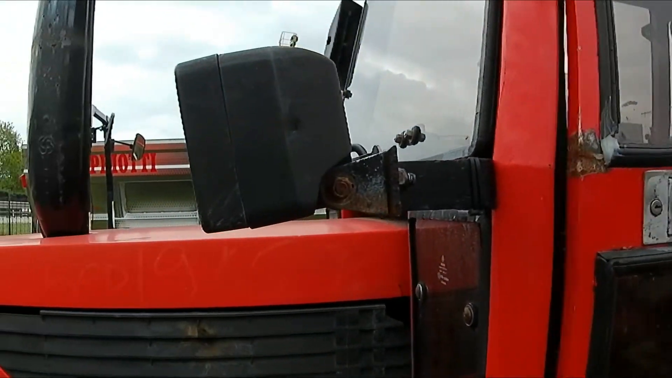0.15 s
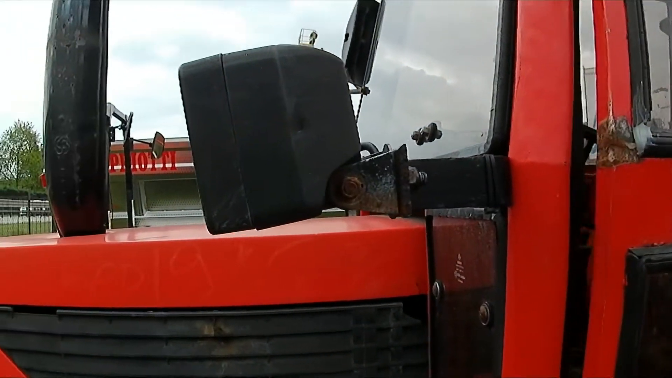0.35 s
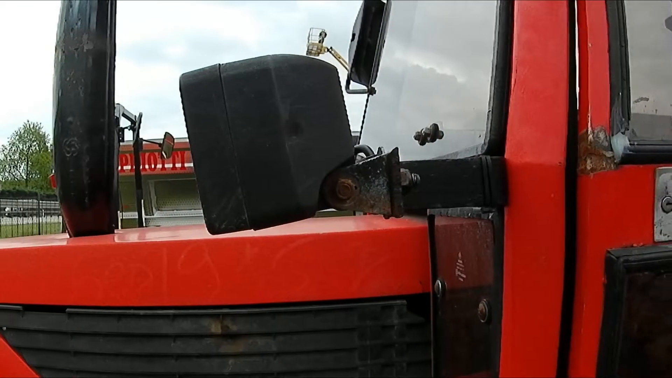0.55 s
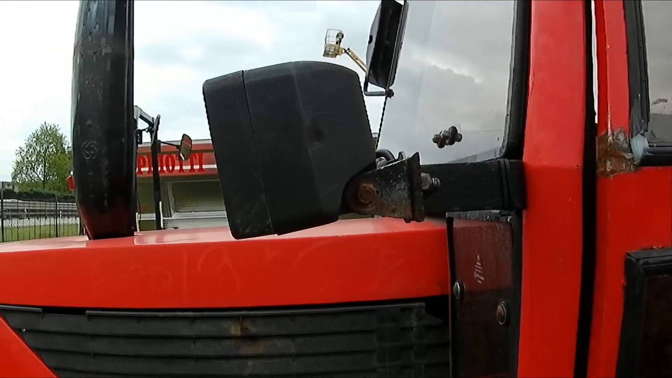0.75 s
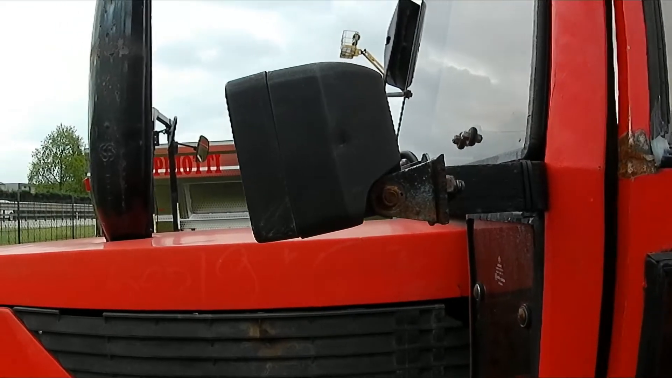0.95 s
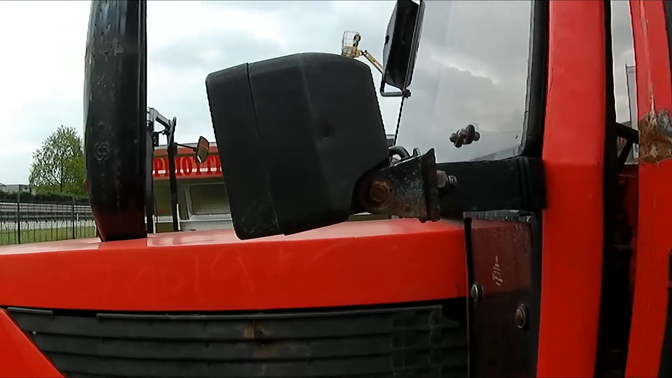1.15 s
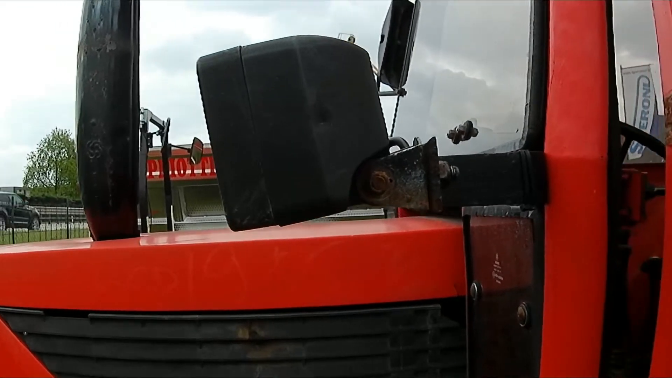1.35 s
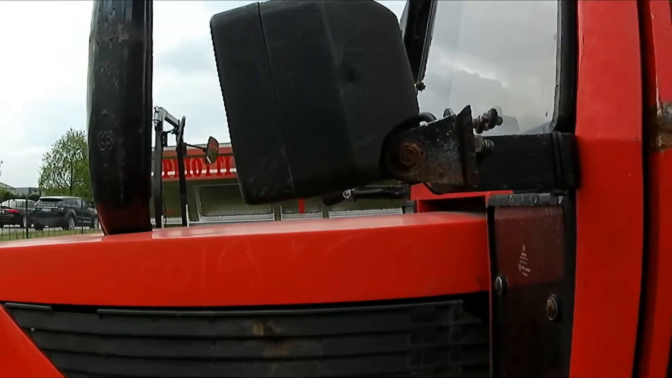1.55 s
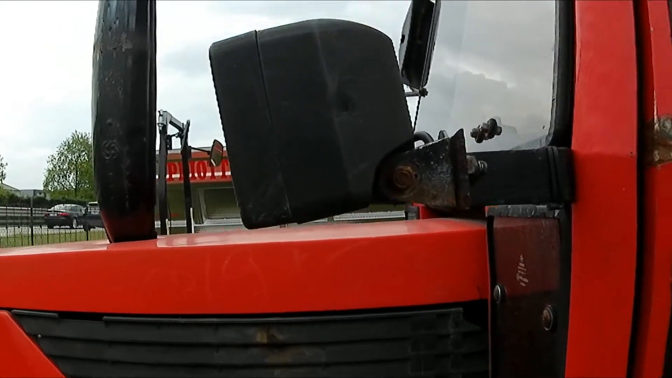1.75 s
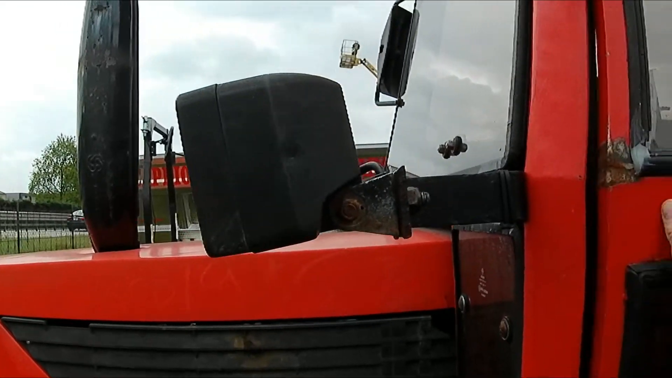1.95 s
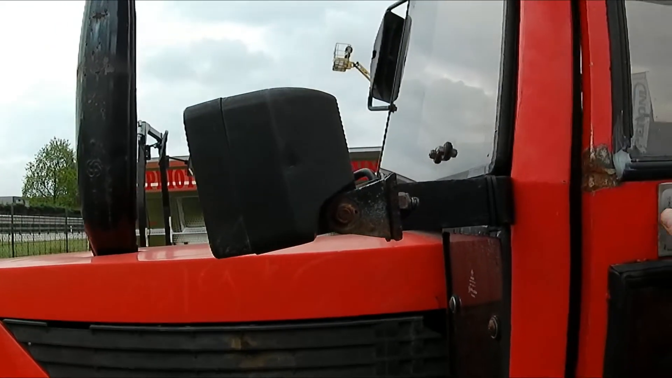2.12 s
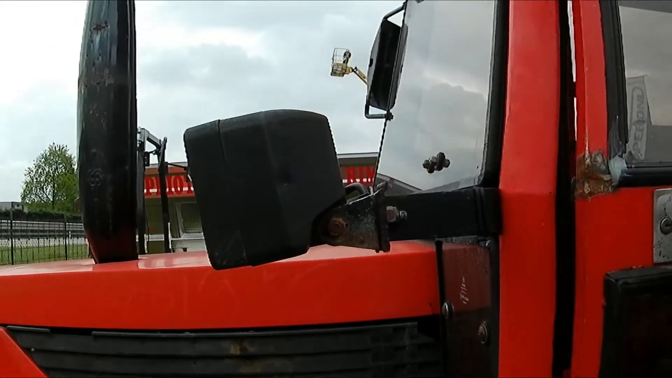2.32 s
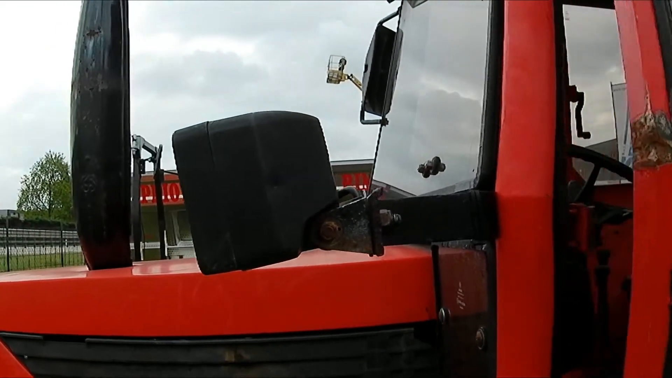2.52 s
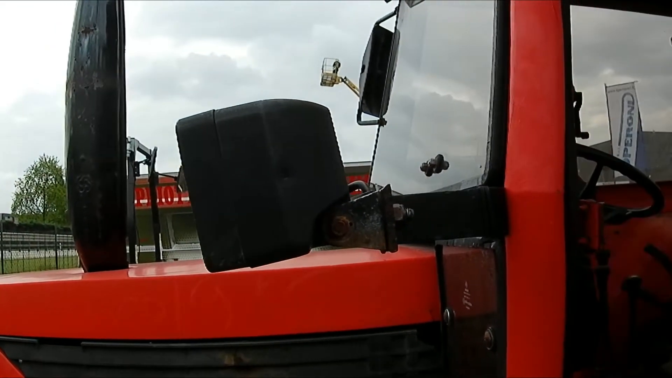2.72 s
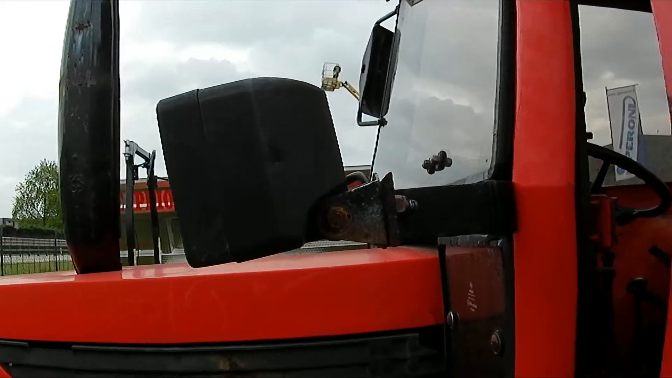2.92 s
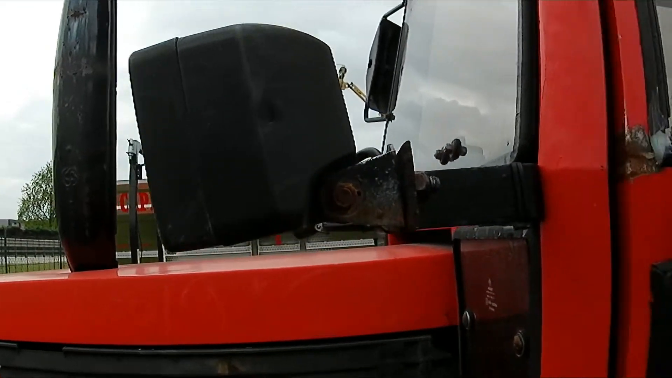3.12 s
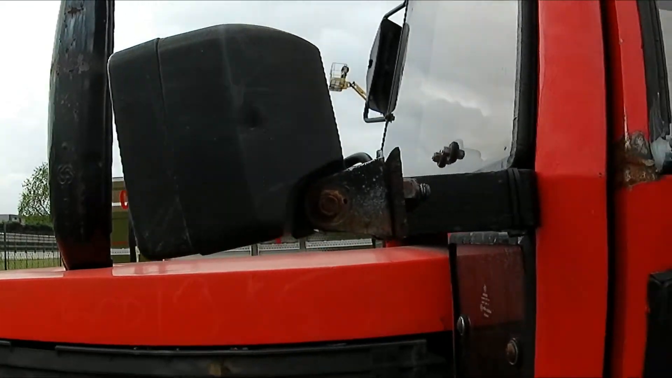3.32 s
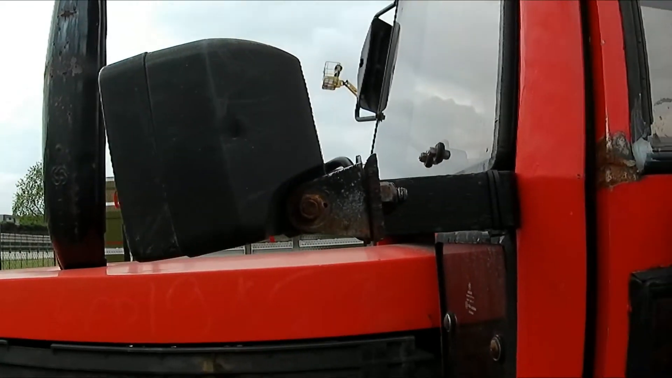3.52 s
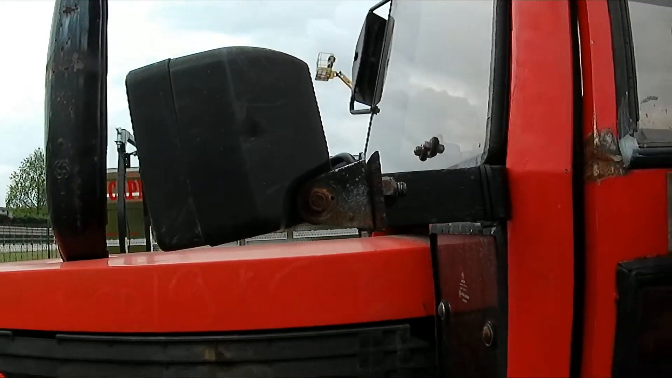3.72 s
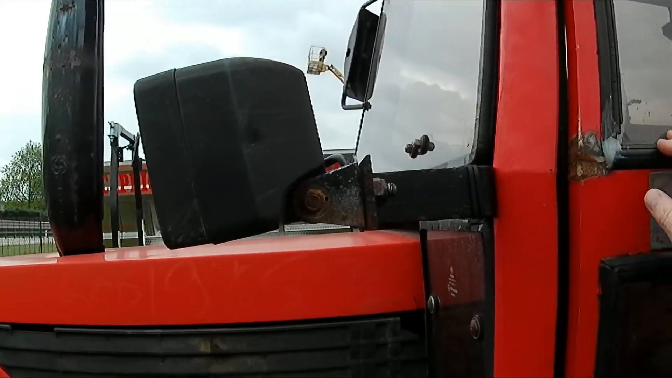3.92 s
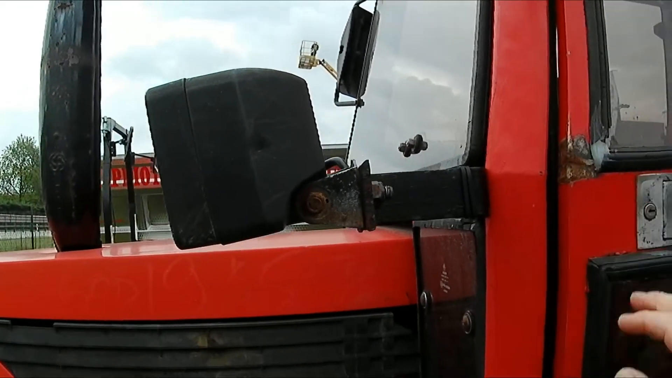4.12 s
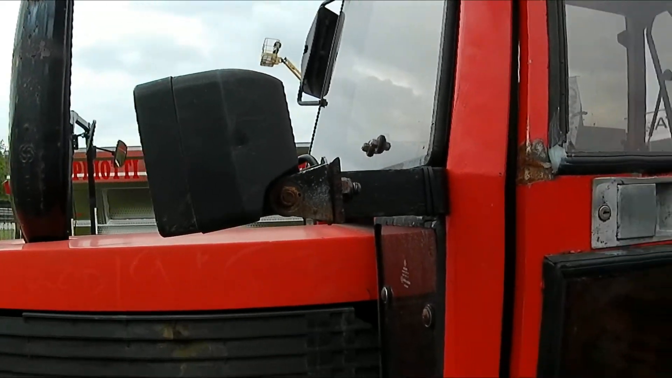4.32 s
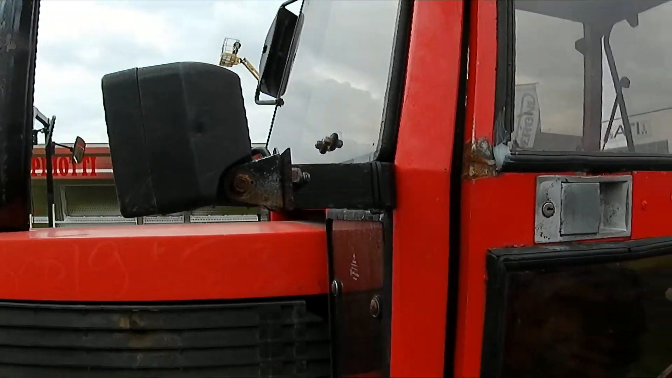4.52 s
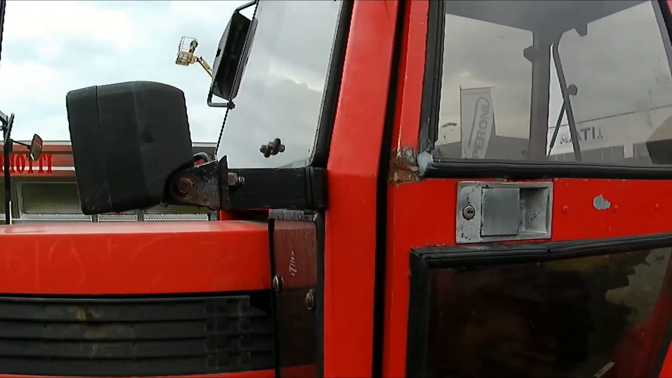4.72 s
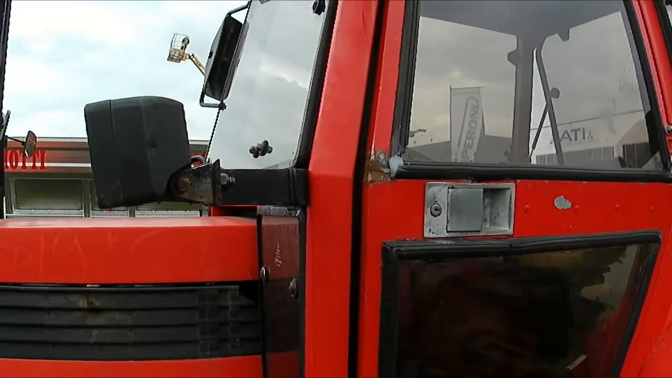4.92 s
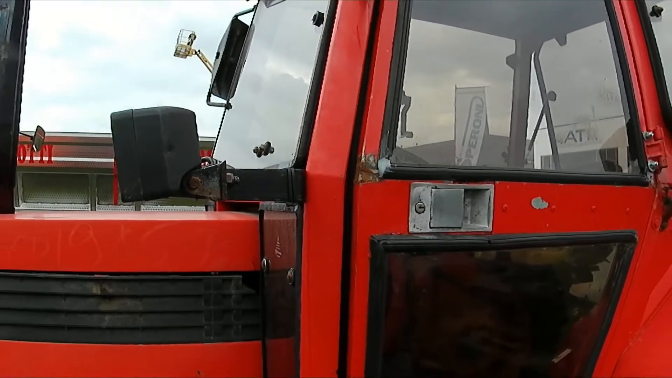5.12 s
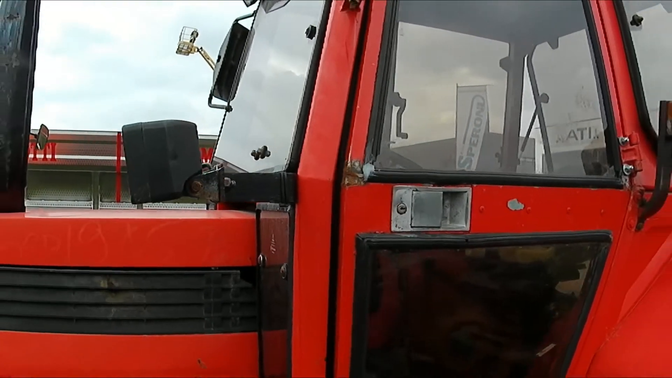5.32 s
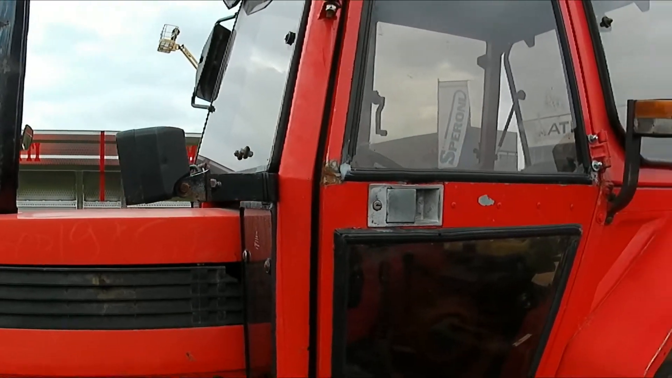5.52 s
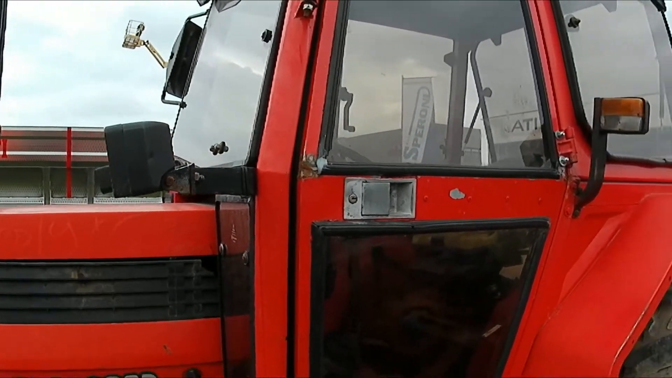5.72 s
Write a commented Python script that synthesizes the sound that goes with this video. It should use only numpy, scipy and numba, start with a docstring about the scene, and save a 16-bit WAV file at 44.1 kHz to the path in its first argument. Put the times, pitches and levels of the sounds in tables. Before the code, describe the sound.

Three loud, boomy metal door slams with clacking latch and brief rattle, over steady traffic wash that swells as one car passes close.

```python
"""The steel door of a tractor cab, slammed by hand three times in an open yard beside a road: pushes excite
its decaying modes, latch contacts add damped knocks, and the panes, panels and yard add shaped noise.
Cars pass, one close, as sliding bands of tyre noise over rumble, drone and hiss; a slow vehicle adds a
harmonic engine tone, and a soft thump is heard near the end. An overloading microphone feeds two paths,
one under gain control, the other late and thin in the bass; their sum combs every sound."""
import sys
import numpy as np
from scipy import signal
from scipy.fft import rfft, irfft, next_fast_len
from scipy.io import wavfile
from scipy.ndimage import uniform_filter1d
from numba import njit

SR = 44100
rng = np.random.default_rng(int(sys.argv[2]) if len(sys.argv) > 2 else 0)


def amplitude_ratio(level_db):
    """Convert a level in decibels to the matching linear amplitude (field) ratio."""
    exponent = np.asarray(level_db, float) / 20
    return 10 ** exponent


def inscribe(sig):
    """Save sig as 16-bit PCM at rate SR to the path in sys.argv[1].

    A 1-D sig is mono; a 2-D sig holds one channel per row.
    Samples are clipped to [-1, 1] before scaling.
    """
    pcm = np.round(np.clip(np.atleast_2d(sig).T, -1, 1) * 32767)
    wavfile.write(sys.argv[1], SR, pcm.astype(np.int16))


N = 253829
T = np.arange(N) / SR


def colour(x, points):
    """Spectral shaping: filter x by (frequency_hz, density_db) points, then scale it to rms 1."""
    hz, db = np.transpose(points)
    size = next_fast_len(len(x))
    f = np.maximum(np.arange(size // 2 + 1) * SR / size, 1)
    gain = amplitude_ratio(np.interp(np.log(f), np.log(hz), db))
    y = irfft(rfft(x, size) * gain, size)[:len(x)]
    return y / np.std(y)


def noise(points):
    """Stationary random sound: white noise of a given spectral shape, rms 1."""
    return colour(rng.standard_normal(N), points)


def fade(start_s, t60_s, rise_s):
    """Reverberant envelope: silence, an exponential rise (time constant rise_s), an exponential decay."""
    age = np.maximum(T - start_s, 0)
    return (1 - np.exp(-age / rise_s)) * np.exp(-np.log(1000) * age / t60_s)


def half_sine(start_s, length_ms):
    """Contact pulse: one half cycle of a sine, peak 1."""
    part = np.clip((T - start_s) / (length_ms / 1000), 0, 1)
    return np.sin(np.pi * part)


def walk(rate_hz):
    """Slow fluctuation: held random steps smoothed twice, spread near 1."""
    hold = int(SR / rate_hz)
    steps = np.repeat(rng.standard_normal(N // hold + 1), hold)
    smooth = uniform_filter1d(uniform_filter1d(steps, hold), hold)
    return 1.44 * smooth[:N]


def curve(table, at=T):
    """Linear interpolation of a two-column table over time."""
    return np.interp(at, *np.transpose(table))


def wavering_noise(points, level_db, waver_db):
    """Amplitude modulation: shaped noise at a moving level with a slow random waver."""
    return noise(points) * amplitude_ratio(level_db + waver_db * walk(5.33))


# Passing cars: start_s, roar_db, roar centre_hz, tread wash_db
ROAD = [(0.03, -36, 940, -50), (0.45, -41, 755, -55), (0.65, -44, 886, -59.5), (1.0, -40, 740, -56.5),
        (1.3, -41, 770, -70.5), (1.55, -43.5, 970, -54), (1.95, -45.5, 930, -55.5), (2.3, -46, 960, -59),
        (2.75, -47, 1025, -62.5), (3.4, -46, 815, -60.5), (3.76, -36.5, 825, -59.5),
        (4.07, -29.5, 784, -50.5), (4.3, -32.5, 810, -47), (4.58, -31.5, 735, -47.5), (4.78, -34, 945, -53),
        (5.05, -34, 1040, -55), (5.3, -40.5, 900, -56), (5.5, -44.5, 880, -60.5), (5.76, -44.5, 1000, -64)]
# Tyre roar spectrum: share of the centre frequency (ratio), density_db (relative, per Hz)
TYRES = [(.2, -16.5), (.45, -4), (.7, -3.5), (1.01, -0.5), (1.4, -4.5), (2.1, -13.5), (3, -30), (5, -44.5)]
# Change on the roar's upper flank: start_s, level_db
FLANK = [(0, -3), (.7, 3.5), (1.4, 6.5), (2.5, 1), (3.5, 1), (4.0, -9.5), (4.5, 4), (5.0, 1), (5.76, -.3)]
# Change at the top of the roar's hump: start_s, level_db
CREST = [(0, -0.5), (.8, -1.5), (1.3, 1), (2.5, -0.5), (3.5, -0.5), (4.1, 6.5), (4.6, 0.5), (5.1, 2.5),
         (5.76, -4)]


def tyre_roar():
    """Filter-bank synthesis: wavering third-octave noise bands follow a spectral hump that slides in pitch."""
    flank_share, flank_octaves, crest_octaves = 2.97, 0.2, 0.52  # place over the centre, half widths
    coarse = np.arange(0, N + 256, 256) / SR  # band levels are worked out every 256 samples
    start_s, road_roar_db, road_centre_hz, _ = np.transpose(ROAD)
    roar_db = np.interp(coarse, start_s, road_roar_db)
    centre_hz = np.interp(coarse, start_s, road_centre_hz)
    share, density_db = np.transpose(TYRES)
    bands_hz = 100 * 2 ** np.arange(0, 5.7, 1 / 3)
    rel = bands_hz[:, None] / centre_hz
    # the second term turns level per Hz into level per band
    db = np.interp(np.log(rel), np.log(share), density_db) + 10 * np.log10(rel)
    db += curve(FLANK, coarse) * np.exp(-(np.log2(rel / flank_share) / flank_octaves) ** 2)
    db += curve(CREST, coarse) * np.exp(-(np.log2(rel) / crest_octaves) ** 2)
    db += roar_db - 10 * np.log10(np.sum(amplitude_ratio(2 * db), axis=0))  # the bands' powers add up to roar_db
    size = next_fast_len(N)
    octaves = np.log2(np.maximum(np.arange(size // 2 + 1) * SR / size, 1))
    white = rfft(rng.standard_normal(size))
    roar = np.zeros(N)
    for hz, band_db in zip(bands_hz, db):
        triangle = np.clip(1 - 3 * abs(octaves - np.log2(hz)), 0, 1)
        band = irfft(white * triangle, size)[:N]
        roar += band / np.std(band) * amplitude_ratio(np.interp(T, coarse, band_db) + 1.76 * walk(5.715))
    return roar


# Tread noise spectrum: frequency_hz, density_db (relative, per Hz)
WASH = [(900, -25), (1600, 0.5), (2500, -2), (4000, -14.5), (6000, -29), (9000, -35)]


def tread_wash():
    """Broadband source: tread noise whose level moves with the passing cars."""
    start_s, _, _, wash_db = np.transpose(ROAD)
    return wavering_noise(WASH, np.interp(T, start_s, wash_db), 2.3)


# Bounce of tyre sound off the ground: start_s, notch_hz, bounce (gain, 0 to 1)
GROUND = [(0, 3330, 0.13), (1.4, 2700, 0), (1.9, 2700, 0.24), (3.6, 2920, 0.01), (4.6, 3350, 0.11),
          (5.0, 2500, 0.32), (5.5, 1870, 0.22)]


def ground(x):
    """Two-path interference: a duller bounced copy, half a notch period late, cancels a sliding band."""
    start_s, notch_hz, bounce = np.transpose(GROUND)
    share = np.clip(np.interp(T, start_s, bounce), 0, 0.9)
    # rough ground returns little above 3500 Hz
    dull = signal.filtfilt(*signal.butter(1, 3500, fs=SR), x)
    delay_s = 0.5 / np.interp(T, start_s, notch_hz)
    late = np.interp(T - delay_s, T, dull)
    return (x + share * late) / (1 + share)


# Rumble spectrum: frequency_hz, density_db (relative, per Hz)
RUMBLE = [(15, -27), (30, -4), (55, 4), (75, -2), (120, -4), (170, -11), (300, -70)]
# Rumble level: start_s, level_db
RUMBLE_LEVEL = [(0, -28), (.5, -36), (1.2, -32.5), (1.9, -36.5), (2.85, -40.5), (3.7, -40.5), (4.2, -34),
                (4.9, -35.5), (5.4, -40), (5.76, -30)]


def rumble():
    """Low-frequency random sound: road rumble at a moving level."""
    return wavering_noise(RUMBLE, curve(RUMBLE_LEVEL), 2)


# Exhaust drone spectrum: frequency_hz, density_db (relative, per Hz)
DRONE = [(90, -25), (150, 10.5), (250, 11.5), (380, 3), (600, -42.5)]


def drone():
    """Level covariation: exhaust noise rises with the tyre roar, a little less; a slow vehicle adds more."""
    start_s, road_roar_db, _, _ = np.transpose(ROAD)
    roar_mid_db, under_roar_db, follows = -40.5, -7, 0.66
    extra_start_s, extra_db, extra_rise_s = 5.13, 4.8, 0.33
    roar_db = np.interp(T, start_s, road_roar_db)
    level_db = roar_mid_db + under_roar_db + follows * (roar_db - roar_mid_db)
    level_db += extra_db * np.clip((T - extra_start_s) / extra_rise_s, 0, 1)
    return wavering_noise(DRONE, level_db, 1)


# Hiss spectrum: frequency_hz, density_db (relative, per Hz)
HISS = [(1500, -20), (4000, 0), (8000, -5), (12000, -7), (16000, -9)]
# Hiss level: start_s, level_db
HISS_LEVEL = [(0, -67.5), (.8, -76.5), (1.3, -80), (2.2, -84), (3.0, -73.5), (3.45, -75), (3.9, -69),
              (4.2, -66), (4.4, -73), (4.68, -86), (5.2, -70), (5.76, -76)]


def hiss():
    """High-frequency random sound: top hiss at a moving level."""
    return wavering_noise(HISS, curve(HISS_LEVEL), 2.3)


def road():
    """Superposition: tyre sounds interfere with their ground bounce; rumble, drone and hiss add directly."""
    return rumble() + drone() + ground(tyre_roar() + tread_wash()) + hiss()


# Door meets its seal, then rebounds on the latch: start_s, blow level_db, push_ms, edge_db (over the blow)
SLAMS = [(0.1063, -3.5, 5.8, -5), (0.142, -18.5, 13, -12), (1.5456, -1, 4.16, -6), (1.581, -23, 15, 2),
         (3.0845, -3, 7.7, -12), (3.12, -14.5, 14, 1.5)]
# Modes of door skin and cab air: pitch_hz, level_db, t60_s, first swing (-1 in, 1 out)
DOOR = [(45.35, 2.5, 0.34, -1), (60.5, -8, 0.3, 1), (83.15, -3, 0.6, -1), (105.06, -6.5, 0.46, 1),
        (122, -11, 0.38, -1), (186.2, 1, 0.3, -1), (257, -23, 0.052, 1), (299, -3.5, 0.19, -1),
        (410.3, -34, 0.99, 1), (499.6, 0.5, 0.094, -1), (636, -28, 0.8, 1), (663, -7, 0.34, -1)]


def push(start_s, level_db, length_ms):
    """Impulse of a force: a half sine whose area, whatever its length, is set by the level."""
    unit_area = np.pi / (2 * length_ms / 1000 * SR)
    return amplitude_ratio(level_db) * half_sine(start_s, length_ms) * unit_area


def ring(force, pitch_hz, t60_s):
    """Modal resonance: one exponentially decaying mode driven by a force."""
    pole = np.exp(2j * np.pi * pitch_hz / SR - np.log(1000) / (t60_s * SR))
    return signal.lfilter([1], [1, -pole], force).imag


def door():
    """Modal excitation: a push sets off the low modes; its short hard edge reaches the higher ones."""
    force = np.zeros(N)
    for start_s, level_db, push_ms, edge_db in SLAMS:
        force += push(start_s, level_db, push_ms)
        force += push(start_s + 0.00369, level_db + edge_db, 1.35)
    return sum(np.sign(way) * amplitude_ratio(level_db) * ring(force, pitch_hz, t60_s)
               for pitch_hz, level_db, t60_s, way in DOOR)


# Crowded upper panel modes: frequency_hz, density_db (relative, per Hz)
CLANK = [(150, -39), (300, 9), (600, -2), (1000, -8.5), (2000, -22), (5000, -61)]
# Dense ringing of cab panels and yard: frequency_hz, density_db (relative, per Hz)
YARD = [(30, -16), (55, 4), (110, 12.5), (250, 5), (600, -16.5), (1500, -22), (4000, -41.5), (15000, -66)]


def clank_and_yard():
    """Diffuse-field decay: every blow swells and dies as noise, a short clank and a longer tail."""
    out = np.zeros(N)
    for shape, tail_db, t60_s in ((CLANK, -9, 0.24), (YARD, -9, 0.52)):
        swell = sum(amplitude_ratio(level_db + tail_db) * fade(start_s, t60_s, 0.022) for start_s, level_db, *_ in SLAMS)
        out += swell * noise(shape)
    return out


# Latch and striker contacts, the same run at every slam: delay_ms after the first contact (before pace),
# level_db (relative to the run), knock pitch_hz (before pitch share), crack_db (relative to the knock)
LATCH = [(0, 6, 2500, -13.5), (3.48, 11, 893, -15), (4.523, 2.5, 1080, -14.5), (5.85, 0, 830, -3),
         (8.11, -0.5, 1440, -25), (11.14, -3, 780, -13), (20.86, -9, 580, -23)]
# Each run of the latch: start_s, level_db, pitch share (ratio), pace share (ratio), first tick_db (added)
CATCHES = [(.1098, -7, 0.838, 1.05, 1.5), (1.55, 1, 1.005, 1.05, 0), (3.0893, -.5, 0.902, .99, -1.5)]
# Spectrum of latch cracks and of rattle ticks: frequency_hz, density_db (relative, per Hz)
TICK_COLOUR = [(200, 7), (600, 10), (1500, 5), (3000, -0.5), (6000, -17.5), (15000, -24.5)]


def latch():
    """Damped impact: each contact is a heavily damped knock, shorter when higher, with a crack of noise."""
    decay_cycles, rise_cycles = 6.8, 0.41  # periods to fall 60 dB, and rise time constant in periods
    crack_t60_s, crack_rise_s = 0.004, 0.0002
    crack = noise(TICK_COLOUR)
    out = np.zeros(N)
    for run_s, run_db, pitch, pace, tick_db in CATCHES:
        for k, (delay_ms, contact_db, contact_hz, crack_db) in enumerate(LATCH):
            start_s = run_s + pace * delay_ms / 1000
            level_db = run_db + contact_db + (tick_db if k == 0 else 0)
            hz = pitch * contact_hz
            knock = fade(start_s, decay_cycles / hz, rise_cycles / hz) * np.sin(2 * np.pi * hz * (T - start_s))
            snap = amplitude_ratio(crack_db) * fade(start_s, crack_t60_s, crack_rise_s) * crack
            out += amplitude_ratio(level_db) * (knock + snap)
    return out


# Loose panes and linkage buzz: start_s, level_db, t60_s
RATTLES = [(0.1105, -15, 0.059), (0.128, -33, 0.075), (0.137, -29, 0.07), (1.546, -25, 0.13),
           (1.564, -45, 0.053), (1.582, -24.5, 0.035), (2.285, -48, .01), (3.086, -26, 0.053),
           (3.101, -26.5, 0.079), (3.12, -21.5, 0.021)]


def rattle():
    """Random repeated impacts: dense noise of uneven strength swells and dies away as loose panes do."""
    uneven = rng.standard_normal(N) * amplitude_ratio(1.9 * walk(900))
    swells = sum(amplitude_ratio(level_db) * fade(start_s, t60_s, 0.00043) for start_s, level_db, t60_s in RATTLES)
    return colour(uneven, TICK_COLOUR) * swells


# Engine of a slow vehicle: start_s, level_db
ENGINE = [(3.9, -56), (4.35, -54), (4.47, -42.5), (5.48, -39), (5.686, -31), (5.756, -43)]
# Harmonics of the firing rate, from the first up: level_db (relative)
ENGINE_ORDERS_DB = [5, -2, -13]


def engine():
    """Harmonic series: firing tone and its first orders, wavering in pitch and level."""
    firing_hz = 55.7 * (1 + 0.0061 * walk(4))
    phase = 2 * np.pi * np.cumsum(firing_hz) / SR
    fade_in = np.clip((T - ENGINE[0][0]) / 0.47, 0, 1)
    gain = amplitude_ratio(curve(ENGINE) + 1.9 * walk(17)) * fade_in
    orders = sum(amplitude_ratio(db) * np.sin(k * phase) for k, db in enumerate(ENGINE_ORDERS_DB, 1))
    return np.sqrt(2) * gain * orders


# Soft thump spectrum: frequency_hz, density_db (relative, per Hz)
THUMP_COLOUR = [(40, -1), (110, 11), (250, 0), (450, -2), (900, -62)]
# Soft thump: start_s, level_db, length_ms
THUMP = (5.63, -30, 53)


def thump():
    """Soft impact: a half-sine burst of low noise, a dull bump like a footfall."""
    start_s, level_db, length_ms = THUMP
    return amplitude_ratio(level_db) * half_sine(start_s, length_ms) * noise(THUMP_COLOUR)


def scene():
    """Linear superposition of the road, the slammed door, the engine and the thump."""
    return (road() + door() + clank_and_yard() + latch() + rattle() + engine() + thump())[None]


@njit
def follow(x, attack, release):
    """Envelope detection: a smoothed magnitude that rises fast and falls slowly."""
    envelope, level = np.empty(len(x)), 0.
    for i in range(len(x)):
        size = abs(x[i])
        level += (size - level) * (attack if size > level else release)
        envelope[i] = level
    return envelope


def top_cut(x):
    """Nothing passes above the cut-off."""
    return signal.sosfilt(signal.butter(12, 15750, fs=SR, output="sos"), x)


def record(dry):
    """Saturation and comb filtering: an overloaded capsule feeds a gain-controlled path and a late thin one."""
    ceiling = 0.65
    capsule = ceiling * dry[0] / (ceiling ** 6 + dry[0] ** 6) ** (1 / 6)
    envelope = follow(capsule, 1 / (0.00033 * SR), 1 / (0.15 * SR))  # attack and release in s
    near = capsule * (1 + envelope / 0.0069) ** -0.25
    bass = signal.lfilter(*signal.butter(1, 550, fs=SR), capsule)
    lag = 768  # samples between the two paths
    late = np.pad(capsule - 0.7 * bass, (lag, 0), mode="reflect")[:N]
    mix = near + amplitude_ratio(-0.5) * late
    low_pass = signal.ellip(10, 0.2, 60, 15750, fs=SR, output="sos")
    mix = signal.sosfilt(low_pass, mix) + 0.0076  # a constant offset
    return top_cut(mix)


dry = scene()
out = record(dry)
inscribe(out)
```